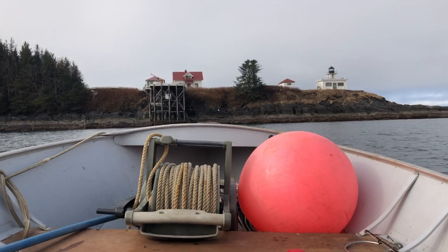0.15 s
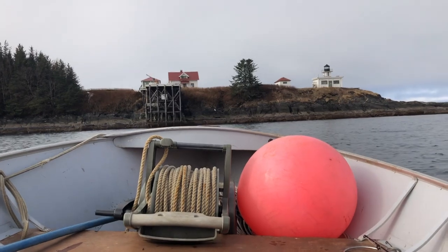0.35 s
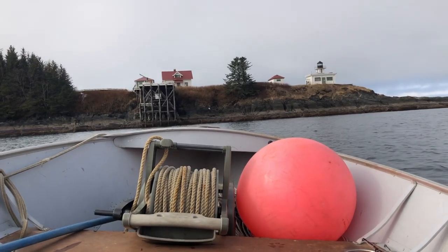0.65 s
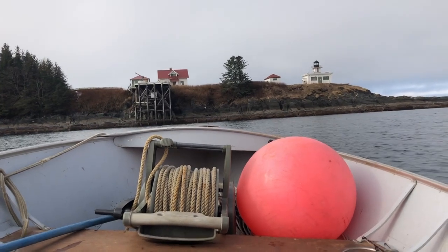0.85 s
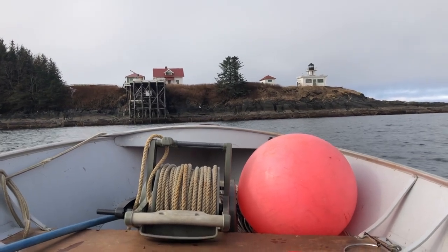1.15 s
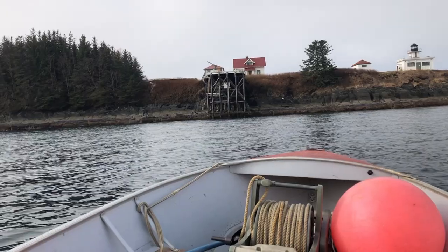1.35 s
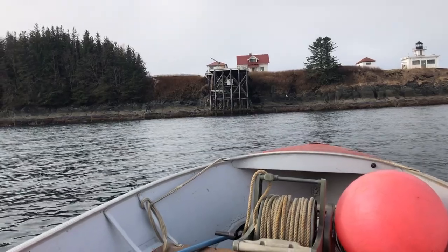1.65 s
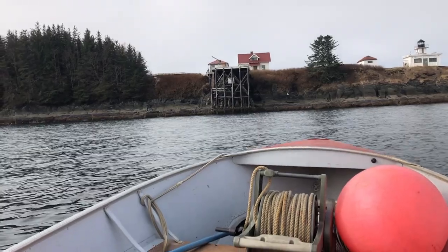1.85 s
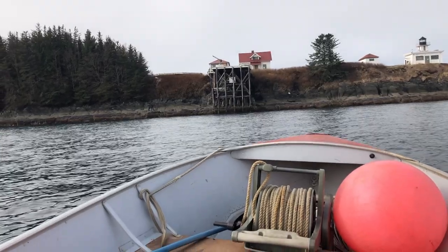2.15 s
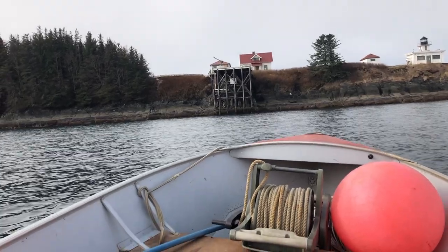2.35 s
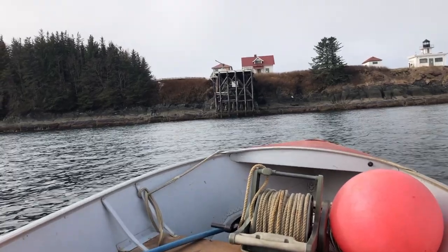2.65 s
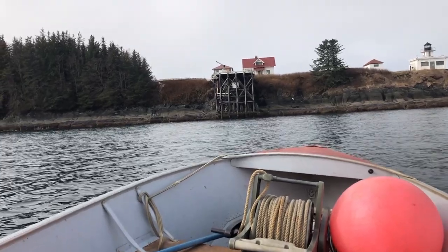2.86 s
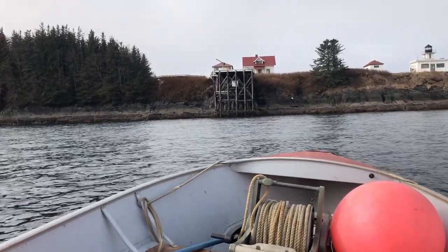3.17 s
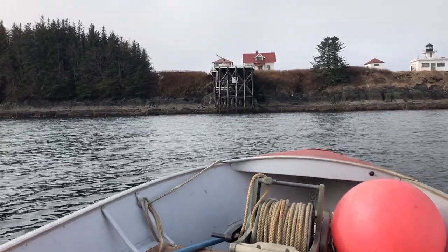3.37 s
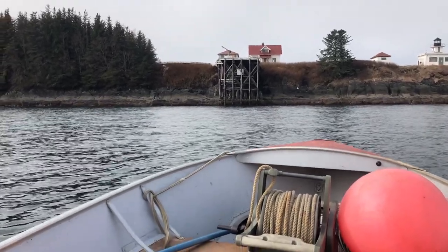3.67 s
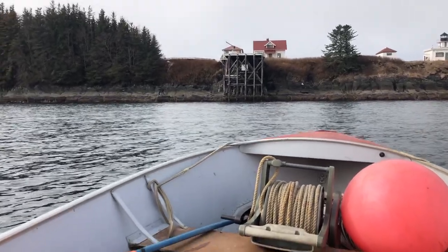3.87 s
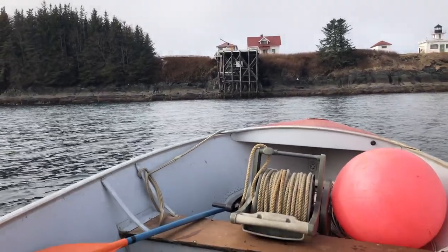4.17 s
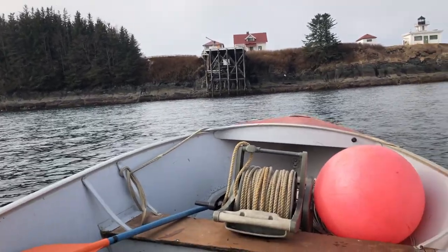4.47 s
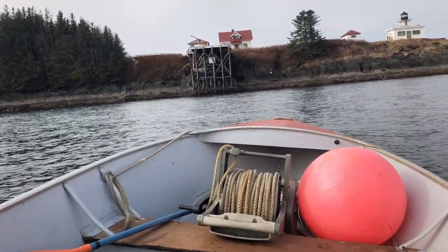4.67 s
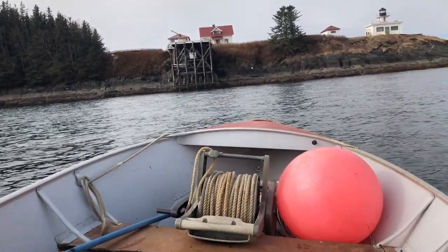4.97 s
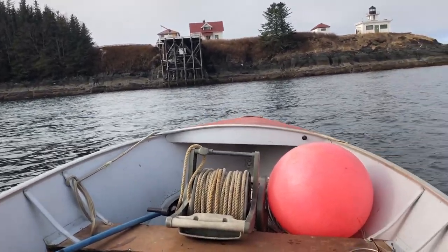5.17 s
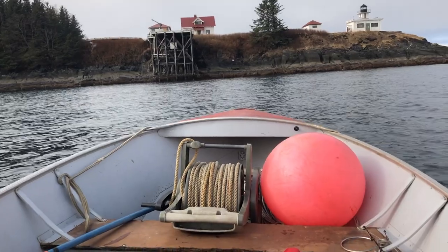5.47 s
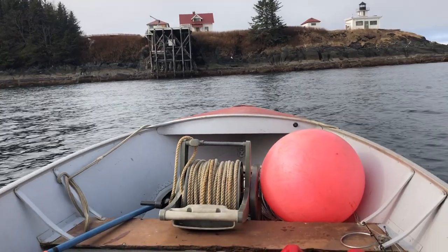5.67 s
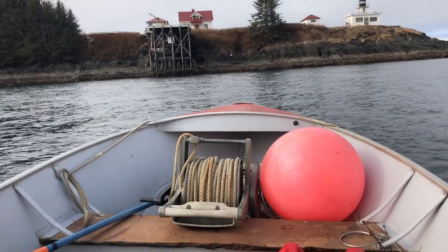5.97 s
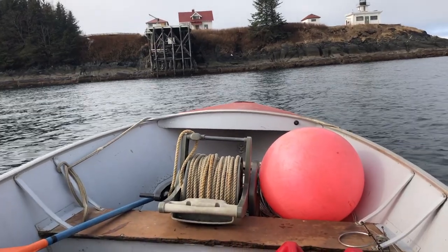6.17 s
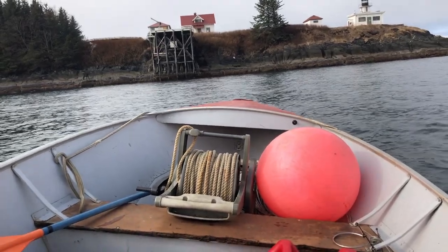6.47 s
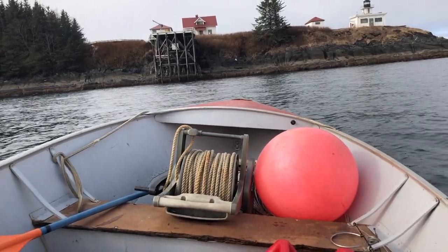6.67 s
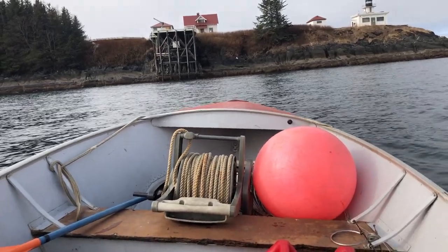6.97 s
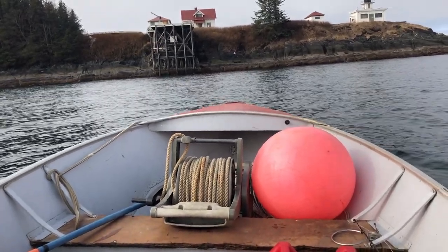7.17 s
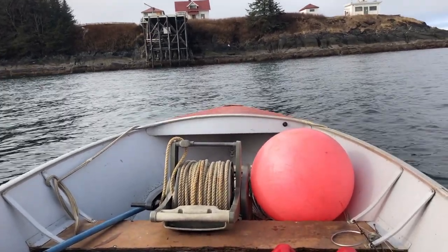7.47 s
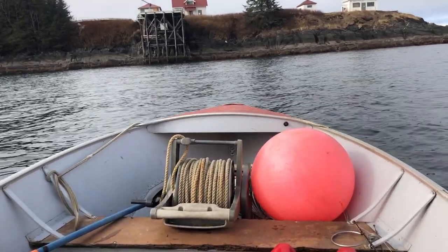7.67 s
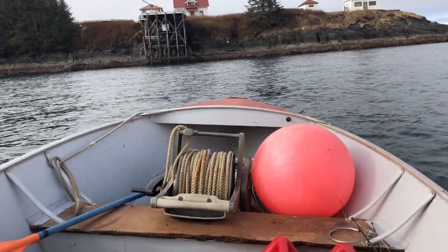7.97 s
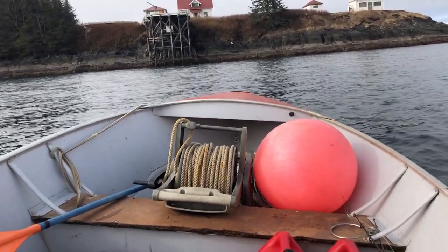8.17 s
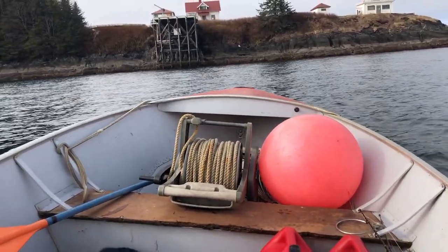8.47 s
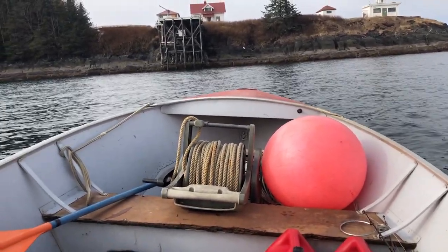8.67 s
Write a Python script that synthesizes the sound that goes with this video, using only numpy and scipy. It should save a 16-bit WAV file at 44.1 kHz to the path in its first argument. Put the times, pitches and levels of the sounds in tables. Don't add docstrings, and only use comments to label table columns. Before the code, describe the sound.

A small three-cylinder outboard shakes a metal skiff, loud and low with dull thumps on the microphone, fading within the first second or so. An abrupt change brings a much quieter airborne idle, puttering and ticking. Around three and a half seconds it picks up under load and whines. Wavelets slap the hull, bubbles chirp, drops tick, and light wind buffets the microphone outdoors at the bow.

```python
import sys
import numpy as np
from scipy import signal
from scipy.fft import rfft, irfft, next_fast_len
from scipy.io import wavfile
from scipy.ndimage import uniform_filter1d, map_coordinates

SR = 44100
rng = np.random.default_rng(int(sys.argv[2]) if len(sys.argv) > 2 else 0)


def nominal_scale(level):
    x = np.asarray(level, float) / 20
    return 10 ** x


def store_pcm(level_fs):
    pcm = np.round(np.clip(level_fs, -1, 1) * 32767).astype(np.int16)
    wavfile.write(sys.argv[1], SR, np.atleast_2d(pcm).T)


N = 388942
T = np.arange(N) / SR
CUT_S = 1.207


def unit(x):
    return x / np.sqrt(np.mean(x ** 2) + 1e-20)


def noise():
    return rng.standard_normal(N)


def curves(rows):
    return np.interp(T, *np.transpose(rows))


def humps(rows):
    return sum(db * np.exp(-((T - s) / half) ** 2) for s, db, half in rows)


def wobble(rate):
    return map_coordinates(rng.standard_normal(int(N * rate / SR) + 4), [T * rate])


def filtered(x, response):
    m = next_fast_len(N + SR)
    return irfft(rfft(x, m) * response(np.fft.rfftfreq(m, 1 / SR)), m)[:N]


def coloured(x, points):
    hz, db = np.transpose(points)
    return unit(filtered(x, lambda f: nominal_scale(np.interp(np.log(f + 0.012), np.log(hz), db, -120, -120))))


def patchy(patchy_db):
    z = signal.stft(noise(), nperseg=512)[2]
    field = uniform_filter1d(rng.standard_normal(z.shape), size=7, axis=0)
    field = uniform_filter1d(field, size=5, axis=1)
    return signal.istft(z * nominal_scale(patchy_db * unit(field)), nperseg=512)[1][:N]


def resonant(x, modes):
    def response(f):
        total = 0
        for k, (centre, width, db) in enumerate(modes):
            damping = 1j * f * width
            total = total + (-1) ** k * nominal_scale(db) * damping / (centre ** 2 - f * f + damping)
        return total
    return unit(filtered(x, response))


def rings(s, db, hz, t60, rise=0, attack=.002, count=4096):
    s, db, hz, t60, rise = (np.broadcast_to(v, np.shape(s))[:, None] for v in (s, db, hz, t60, rise))
    t = np.arange(count) / SR
    turns = np.cumsum(hz * 2 ** (rise * np.minimum(t / t60, 1)), axis=1) / SR
    envelope = nominal_scale(db - 60 * t / t60) * (1 - np.exp(-t / attack)) * np.hanning(2 * count)[count:]
    wave = envelope * np.sin(2 * np.pi * turns)
    at = np.round(s * SR).astype(int) + np.arange(count)
    return np.bincount(at.ravel(), wave.ravel(), N + count)[:N]


def bursts(s, db, hz, half, skew=0, count=2048):
    s, db, hz, half = (np.broadcast_to(v, np.shape(s))[:, None] for v in (s, db, hz, half))
    t = np.arange(-count, count) / SR
    at = np.round(s * SR).astype(int) + np.arange(2 * count)
    envelope = nominal_scale(db) * np.exp(-(t / (half * (1 + skew * np.sign(t)))) ** 2)
    wave = envelope * np.cos(2 * np.pi * hz * t)
    return np.bincount(at.ravel(), wave.ravel(), N + 2 * count)[count:N + count]


def grains(rate, hz, spread, cycles, size_db, attack=0.00091):
    luck = rng.random((int(rate * N / SR), 4))
    pitch = np.clip(hz * np.exp(spread * (luck[:, 1] + luck[:, 2] - 1) * 2), 200, 15000)
    level_db = -size_db * np.log(luck[:, 3] + .02)
    return unit(rings(luck[:, 0] * N / SR, level_db, pitch, cycles / pitch, rise=0.6, attack=attack, count=768))


def crank():
    # time in seconds, firings per second.
    first_rate = [(0.0, 19.71), (0.4, 20.69), (0.8, 20.32), (1.21, 20.19)]
    second_rate = [(1.2, 20.06), (1.8, 20.46), (2.4, 19.78), (3.0, 20.54), (3.3, 20.15), (3.6, 20.35),
                   (3.9, 22.26), (4.3, 23.26), (4.8, 23.36), (5.4, 22.97), (6.0, 23.19), (6.6, 22.92),
                   (7.2, 22.97), (7.8, 22.94), (8.3, 23.31), (8.82, 22.8)]
    first = T < CUT_S
    count = np.cumsum(np.where(first, curves(first_rate), curves(second_rate))) / SR
    count += np.where(first, -.05, .387 - np.interp(second_rate[0][0], T, count))
    load = np.interp(T, [3.56, 3.95], [0, 1])
    return count, np.array([first, ~first * (1 - load), ~first * load])


def hull_shake(fired, state):
    # cycle order, then dB re the firing line on the hull, idling, under load.
    orders = [(1, -20, -9, -10), (2, -12, -11, -22), (3, 0, 0, 0), (5, -27, -24, -35), (6, -20, -20, -15),
              (8, -37, -25, -26), (9, -31, -12, -23), (10, -36, -32, -33), (12, -25, -29, -17),
              (15, -33, -28, -22), (18, -42, -28, -38), (24, -43, -40, -40), (30, -45, -45, -45)]
    # time in seconds, level in dB.
    contact = [(0, -12), (.1, -6.5), (.88, -8.5), (1.19, -6.5), (1.23, -29.5), (2.1, -32), (2.8, -34),
               (3.45, -30), (3.68, -22), (4.1, -27), (4.5, -28), (4.8, -30.5), (5.8, -29), (6.6, -30),
               (7.5, -33), (8.82, -31.5)]
    # centre in seconds, change in dB, half length in seconds.
    slack = [
        (2.95, -13, .22),
        (2.28, -6, 0.11),
    ]
    shake_db = curves(contact)
    aloft_db = (1 - state[0]) * np.minimum(-30 - shake_db, 1)
    lag_firings = np.dot((0, .07, .23), state)
    out = np.zeros(N)
    for order, *db in orders:
        high = order > 6
        level_db = np.dot(db, state) + high * aloft_db
        if order == 9:
            level_db = level_db + humps(slack)
        if order != 3:
            level_db = level_db + 1.2 * wobble(3)
        out += nominal_scale(level_db) * np.cos(2 * np.pi * order * (fired - high * lag_firings) / 3)
    return np.sqrt(2) * nominal_scale(shake_db) * out


def strokes(shaft, state):
    # place in firings, pitch in Hz, half length in seconds, peak in dB on the hull,
    # idling, under load, scatter in dB.
    parts = [(1.745, 165, .0078, -39, -32, -31, .7), (1.745, 255, .005, -54, -47, -44, 2),
             (2.4, 1325, .0085, -52, -43, -47, .8), (1.745, 330, .006, -48, -42, -39.5, 1.2),
             (2.4, 170, .007, -44, -41, -52, 2), (2.02, 372, .015, -48, -44, -47, 1),
             (2.48, 1465, .008, -56, -56, -49, 3), (1.4, 1330, .006, -58, -53, -51, 3),
             (.41, 368, .007, -50, -41.5, -58, 1.5), (2.76, 175, .007, -60, -54, -44, 2),
             (2.66, 350, .008, -60, -56, -45, 2), (.26, 520, .0022, -46, -40, -56, 1.5),
             (1.25, 530, .0022, -46, -39.5, -56, 1.5), (2.26, 540, .0021, -46, -39.5, -56, 1.5)]
    # centre in seconds, change in dB, half length in seconds.
    pick_up = [
        (3.83, 7, 0.34),
        (2.93, 0.5, .07),
        (3.4, -15, .06),
        (3.38, -26, 0.06),
        (2, -2.5, 0.26),
        (1.5, -8, .2),
        (4.7, 1, .3),
        (8.3, -9, .5),
        (2.72, 2.5, 0.11),
    ]
    harden_db = humps(pick_up)
    out = np.zeros(N)
    for place, hz, half_s, *db, scatter_db in parts:
        at = np.flatnonzero(np.diff(np.floor((shaft - place) / 3)) > 0)
        luck = rng.standard_normal((len(at), 3))
        level_db = np.dot(db, state) + (hz == 1325) * harden_db
        peak_db = level_db[at] + scatter_db * luck[:, 0]
        start_s = np.abs(at / SR + .0002 * luck[:, 1])
        skew = .17 * (hz < 340)
        out += bursts(start_s, peak_db, hz * (1 + .004 * luck[:, 2]), half_s, skew=skew)
    return out


def exhaust(shaft, state):
    # frequency in Hz, density in dB per Hz.
    puff_spectrum = [(180, -28.5), (300, -5), (480, 10), (700, -12.5), (1100, -23), (2000, -14.5),
                     (5000, -18), (9000, -45)]
    since = (shaft - .22) % 1
    length_firings = np.dot((.12, .06, .12), state)
    gate = since * np.exp(-since / length_firings) * nominal_scale(1.3 * wobble(20))
    level_db = np.dot((-44, -42, -56), state) - 9.0
    return nominal_scale(level_db) * coloured(gate * (noise() + 2.0), puff_spectrum)


def casing(shaft, state):
    # resonance in Hz, width in Hz, level in dB.
    cowl_modes = [(874, 164, -5), (1176, 88, -5), (1365, 143, -0.5), (1806, 93, -5), (2230, 80, -6.5)]
    # pitch in Hz, wander in Hz, level in dB on the hull, idling, under load.
    gear_lines = [(728, 3, -9, -6, 1.5), (820, 2, -12, -8, 1), (895, 3, -12, -1, -12),
                  (930, 10, -12, -9, -2), (1146, 5, -12, -3, -3), (1332, 9, -12, -8, -1.5)]
    # centre in seconds, rise in dB, half length in seconds.
    surges = [
        (1.3, 5, .2),
        (3.8, 10, 0.34),
        (4.61, 14.5, 0.23),
        (5.86, 16, 0.17),
        (6.39, 15, 0.15),
        (7.25, 15, 0.63),
        (8.55, 13, 0.32),
    ]
    pan_db = np.dot((-40.5, -43.5, -43), state) + 0.78 * wobble(2.38)
    cowl_db = np.dot((-59.5, -58, -55), state) + 0.15 * wobble(1.5)
    whine_db = np.dot((-73, -60.5, -63), state) + humps(surges)
    beat = nominal_scale(1.5 * np.cos(2 * np.pi * (shaft - .35)) + 0.5 * np.cos(2 * np.pi * (shaft - 2.2) / 3))
    out = nominal_scale(pan_db - 8.5) * resonant(beat * noise(), [(372, 20, 1.5), (255, 90, -9), (420, 30, -8)])
    out += nominal_scale(cowl_db + 2.0) * resonant(beat * noise(), cowl_modes)
    for hz, wander_hz, *db in gear_lines:
        level_db = np.dot(db, state) + 1.5 * wobble(5)
        turns = np.cumsum(hz + 1.6 * wander_hz * wobble(9)) / SR
        out += nominal_scale(cowl_db - 5.2 + level_db) * np.sin(2 * np.pi * turns)
    whine = resonant(resonant(beat * noise(), [(1462, 60, 0)]), [(1462, 70, 0)])
    return out + nominal_scale(whine_db - 4.5) * whine


def motor():
    fired, state = crank()
    shaft = fired + np.interp(T, [3.4, 3.95], [0, 1 / 3])
    return hull_shake(fired, state) + strokes(shaft, state) + exhaust(shaft, state) + casing(shaft, state)


def running_water():
    # time in seconds, strength in dB.
    flow = [(0, -49.5), (.275, -46.5), (.31, -57), (.55, -55.5), (.82, -60.5), (1.19, -55), (1.23, -66.5),
            (2.3, -64), (3, -63), (5.25, -61.5), (5.5, -66), (6.2, -61), (6.55, -61.5), (7.0, -57.5),
            (7.4, -56), (7.65, -60.5), (8.0, -62.5), (8.7, -57)]
    # centre in seconds, rise in dB, half length in seconds.
    breaking = [(1.5, 6, .02), (1.82, 5.5, 0.015), (2.52, -2, 0.013), (3.59, 2.5, 0.014), (3.93, 2.5, .03),
                (4.25, 0, 0.02), (4.54, 2, 0.01), (5.2, -2, .03), (5.75, -1, 0.016), (6.9, -2, 0.017),
                (8.57, 4.5, 0.023), (1.95, 3, .05), (2.09, 8, 0.04), (2.39, 3.5, 0.037), (2.64, 0, 0.081),
                (6.39, 5.5, 0.051), (6.7, -1, 0.02), (6.83, -2, 0.012), (7.43, 2, 0.036), (7.64, 4, 0.012),
                (7.82, 5.5, 0.078), (8.16, 2.5, 0.058)]
    # centre in seconds, dB, half length in seconds.
    backwash = [(.25, 1.5, 0.049), (0.328, 6.5, 0.046), (0.56, 2, 0.022), (0.69, 3, 0.22),
                (1.076, 5.5, 0.078), (6.4, 1, 0.28), (4.14, -3.5, 0.36), (0.41, 1, 0.055),
                (0.67, -1.5, .05), (7.1, 2.5, 0.13), (4.8, -1.5, 1.6), (8.81, 4, 0.45)]
    # centre in seconds, change in dB, half length in seconds.
    shelter = [
        (8.1, 2, 0.18),
        (8.3, -5.5, 1),
    ]
    # frequency in Hz, density in dB per Hz.
    wash_spectrum = [(120, -29.5), (250, 0.5), (430, -2), (540, -3.5), (720, -3), (1300, -4), (1700, -10),
                     (2600, -18.5), (4000, -25)]
    splash_spectrum = [(1060, -22), (1800, -22), (1930, -1), (2300, -7.5), (2570, -6), (5500, -8),
                       (6200, -19.5), (8840, -43.5)]
    spray_spectrum = [(3410, -8), (5800, -6), (6650, -6.5), (8000, -4.5), (10200, -8.5), (11200, -12),
                      (15600, -23.5)]
    mean_flow_db = -62
    flow_db = curves(flow)
    splash_db = flow_db + humps(breaking)
    wash_db = -52 + 0.43 * (flow_db - mean_flow_db) + humps(backwash)
    spray_db = -70 + 0.98 * (splash_db - mean_flow_db) + humps(shelter)
    lap = np.where(T < CUT_S, .4, 1) * wobble(7.7)
    spritz_db = 1.4 * wobble(18)
    near = np.where(T < CUT_S, .35, 1)
    fizz = near * grains(500, 3800, 0.5, cycles=8.8, size_db=2.0)
    mist = near * grains(280, 9900, 0.47, cycles=8.1, size_db=2.5)
    gurgle = grains(300, 950, .5, cycles=12, size_db=2.5)
    drizzle = near * grains(45, 7000, .6, cycles=14, size_db=3, attack=.0002)
    wash = coloured(patchy(patchy_db=1.3) + .3 * gurgle, wash_spectrum)
    splash = coloured(patchy(patchy_db=2.3) + .5 * fizz, splash_spectrum)
    spray = coloured(patchy(patchy_db=1.5) + .3 * fizz + .25 * mist, spray_spectrum)
    out = nominal_scale(wash_db + 2.0 + 0.77 * lap) * wash
    out += nominal_scale(splash_db + 0.87 * lap + spritz_db) * splash
    out += nominal_scale(spray_db + 1.3 * lap + spritz_db) * spray
    return out + nominal_scale(-80 + .5 * (splash_db - mean_flow_db)) * drizzle


def wave_slaps():
    # start in seconds, peak in dB, pitch in Hz, t60 in seconds.
    hits = [(1.048, -18, 248, 0.097), (1.349, -22, 267, 0.068), (2.328, -27, 243, 0.13),
            (3.21, -24.5, 249, 0.16), (3.771, -26, 263, 0.11), (4.294, -25, 217, 0.068),
            (6.342, -26, 245, 0.09), (6.379, -38, 255, 0.18), (6.697, -33, 387, 0.07),
            (6.698, -35, 500, 0.066), (5.02, -34, 397, 0.076), (7.325, -37, 295, 0.31),
            (8.432, -28.5, 278, 0.16), (8.469, -25.5, 296, 0.16)]
    s, db, hz, t60_s = np.transpose(hits)
    return rings(s, db + 0.5, hz, t60_s, rise=0.32, attack=0.0039, count=8192)


def cracks():
    # start in seconds, peak in dB, t60 in seconds.
    crests = [
        (1.047, -36, .012),
        (1.345, -41, .02),
        (2.316, -29, .03),
        (2.786, -34, .015),
        (5.268, -38, .012),
        (6.405, -38, .02),
        (6.694, -28, .03),
        (8.395, -36, .015),
    ]
    # frequency in Hz, density in dB per Hz.
    crack_spectrum = [(300, -5), (600, 11), (1000, 10.5), (1800, 3.5), (4000, -11), (6500, -17),
                      (12000, -55)]
    envelope = np.zeros(N)
    for s, db, t60_s in crests:
        after_s = np.maximum(T - s, 0)
        envelope += nominal_scale(db - 60 * after_s / t60_s) * (1 - np.exp(-after_s / 0.001))
    return envelope * coloured(noise(), crack_spectrum)


def bubbles():
    # start in seconds, peak in dB, initial pitch in Hz, rise in octaves, life in seconds.
    chirps = [(1.074, -54.5, 3660, -.05, 0.098), (.468, -42, 1170, -0.0095, 0.022),
              (2.385, -51, 1960, 0.66, .015), (2.635, -45, 854, 0.28, 0.048),
              (3.153, -45.5, 2300, -.5, 0.018), (3.158, -49, 1950, 0.48, .014),
              (5.265, -40, 1195, -0.44, 0.019), (5.79, -40.5, 428, -0.13, 0.03),
              (2.92, -43, 485, 0.011, 0.046), (4.74, -44, 880, 0.25, 0.023),
              (6.405, -46.5, 687, 0.032, 0.047), (6.985, -40, 923, 0.73, 0.022),
              (7.53, -55.5, 6200, -.05, 0.032), (7.552, -38, 482, 1.33, 0.061),
              (7.725, -43, 733, -0.0067, 0.034), (8.14, -41, 690, 0.31, 0.033),
              (8.39, -37, 680, 0.44, 0.018), (8.685, -38, 528, -0.19, 0.039), (8.70, -38, 858, 0.49, 0.03),
              (8.66, -44, 2260, 0.43, 0.013)]
    out = np.zeros(N + SR)
    for s, db, hz, rise, life_s in chirps:
        u = np.linspace(0, 1, int(life_s * SR))
        turns = np.cumsum(hz * 2 ** (rise * u)) / SR
        out[round(s * SR):][:len(u)] += nominal_scale(db) * np.sin(np.pi * u ** 0.45) * np.sin(2 * np.pi * turns)
    return out[:N]


def drops():
    # start in seconds, peak in dB, pitch in
    # Hz.
    spits = [(1.636, -48, 3100), (2.3184, -46, 2870), (2.4027, -41, 3850), (2.5145, -43, 5200),
             (2.6851, -46, 3060), (2.7843, -48, 3350), (3.3815, -48, 2730), (3.4598, -44, 3070),
             (3.5431, -46, 2950), (3.5666, -48, 3340), (3.6868, -44, 3120), (4.3508, -49, 2990),
             (4.4331, -50, 4150), (4.479, -48, 2900), (4.5389, -45, 2790), (4.6232, -49, 2950),
             (4.7534, -42, 2600), (4.8057, -50, 3050), (5.0083, -46, 3070), (5.127, -42, 4380),
             (5.1924, -43, 3800), (5.2253, -49, 2900), (5.2697, -37, 3090), (5.4009, -46, 3320),
             (5.5311, -48, 3330), (5.6618, -48, 2900), (5.7311, -46, 3170), (5.792, -48, 2920),
             (5.8793, -40, 4760), (6.3168, -46, 2950), (6.3887, -45, 2660), (6.695, -49, 2900),
             (6.7404, -40, 4070), (6.8007, -45, 3150), (6.8187, -37, 3340), (6.9384, -43, 2880),
             (7.0107, -43, 3530), (7.0447, -43, 4470), (7.0791, -44, 2960), (7.1958, -44, 2680),
             (7.2442, -45, 2870), (7.4607, -40, 3120), (7.4981, -39, 3680), (7.576, -51, 2650),
             (7.6159, -45, 2990), (7.6393, -48, 2810), (7.7331, -50, 3390), (7.7705, -46, 4420),
             (7.8339, -43, 2870), (8.1457, -44, 4470), (8.199, -43, 2780), (8.4734, -46, 2810),
             (8.4934, -46, 2850), (8.5687, -43, 2800), (8.662, -39, 2830), (8.7872, -50, 3100),
             (2.3191, -43, 4370), (2.4294, -56, 4530), (4.3101, -52, 4890), (4.342, -50, 5610),
              (4.3505, -49, 4040), (4.5444, -51, 4200), (4.8055, -46, 4490), (4.8574, -51, 4650),
              (5.2001, -52, 4620), (5.2255, -46, 4240), (5.2589, -48, 5460), (7.6405, -46, 5150),
              (7.7318, -48, 5520), (7.7707, -47, 4420), (8.1459, -50, 4460), (8.1574, -44, 4570),
              (8.1993, -45, 4530), (8.4931, -48, 5280), (8.5704, -42, 4780), (8.6128, -51, 4240),
              (8.7494, -48, 4060)]
    ticks = [(1.047, -31.5, 2010), (1.3845, -61, 7000), (1.6668, -56, 11000), (1.82, -56, 7500),
             (2.0065, -53, 12000), (2.048, -47, 5200), (2.1038, -44, 6500), (2.3557, -49, 7220),
             (2.685, -58, 11000), (2.7025, -52, 7000), (2.95, -55, 7000), (3.59, -54, 7000),
             (4.5393, -48, 5710), (4.7882, -54, 7000), (4.8576, -52, 6340), (5.0786, -58, 12500),
             (5.1998, -58, 11700), (5.2153, -52, 8500), (5.6982, -57, 7000), (6.1232, -60, 12000),
             (6.3826, -48, 7000), (6.431, -55, 7000), (6.6684, -46, 7600), (6.669, -50, 10800),
             (6.7278, -56, 12000), (6.8939, -53, 7270), (7.2217, -51, 11500), (8.4354, -54, 7000)]
    s, db, hz = np.transpose(spits)
    out = rings(s, db + 0.5, hz, 0.011, rise=.3, attack=0.0004, count=1024)
    return out + bursts(*np.transpose(ticks), np.full(len(ticks), .0005), count=256)


def cooling_jet():
    # centre in seconds, rise in dB, half length in seconds.
    jet_rises = [
        (2.85, 10.2, 0.43),
        (4.3, 5.9, 1.3),
        (7.201, 8.4, 0.41),
    ]
    hiss = resonant(resonant(noise(), [(9700, 1700, 0)]), [(9700, 1800, 0)])
    return nominal_scale(-84 + humps(jet_rises)) * (T > CUT_S) * hiss


def water():
    return running_water() + wave_slaps() + cracks() + bubbles() + drops() + cooling_jet()


def wind():
    # centre in seconds, rise in dB, half length in seconds.
    gusts = [(.5, 7, 0.15), (1.23, 6.5, 0.056), (1.72, 12, 0.13), (2.1, 10, 0.2), (2.6, 8, 0.11),
             (3.75, 8, 0.14), (4.3, 9.5, 0.45), (4.75, 12.5, 0.23), (5.5, 11, 0.4), (6.55, 14.5, 0.22),
             (7.04, 8, 0.066), (7.6, 15.5, 0.13), (8.2, 14, 0.3), (8.68, 16.5, 0.16)]
    eddies = [
        (.5, -4.5, 0.4),
        (1.5, 3, 0.25),
        (3.8, 5, 0.3),
        (4.35, 3.5, 0.19),
        (7.2, 4, 0.35),
        (8.7, 4, 0.17),
        (2.95, -0.5, 0.14),
    ]
    # centre in seconds, peak in dB, pitch in Hz, half length in seconds.
    thumps = [(0.699, -14.5, 79, 0.011), (0.721, -19, 59.5, 0.014), (0.749, -11, 79, 0.0077),
              (0.773, -17, 60, 0.014), (0.845, -10, 79, 0.009), (0.868, -14.5, 64.5, 0.0054),
              (3.602, -17.5, 83, 0.0062), (3.626, -37, 95, 0.0068), (3.703, -30, 75, 0.022),
              (3.766, -28.5, 90, 0.011), (3.864, -20, 81, 0.0097), (3.882, -31, 85, 0.012),
              (3.918, -24.5, 79.5, 0.011), (3.984, -29.5, 75, 0.011), (4.296, -26.5, 84, 0.017),
              (7.059, -26.5, 68, 0.012), (7.3, -30, 72.6, 0.009)]
    # frequency in Hz, density in dB per Hz.
    swell_spectrum = [(.6, -16), (2, -6.5), (4, -8), (7, -17), (11, -28), (20, -48)]
    buffet_spectrum = [(12, -32.5), (28, -5), (50, -5), (85, -8), (120, -7.5), (170, -8.5), (260, -15),
                       (420, -30)]
    swell_db = np.where(T < CUT_S, -29, -30) + humps(gusts)
    buffet_db = np.where(T < CUT_S, -37, -46) + humps(eddies)
    swell = coloured(noise(), swell_spectrum)
    swell = unit(swell / (0.53 + uniform_filter1d(np.abs(swell), size=SR // 3)))
    buffet = unit(nominal_scale(1.4 * wobble(14)) * coloured(noise(), buffet_spectrum))
    return nominal_scale(swell_db) * swell + nominal_scale(buffet_db) * buffet - bursts(*np.transpose(thumps))


def scene():
    return (motor() + water() + wind())[None]


def band_limit(x):
    return signal.sosfilt(signal.butter(12, 15710, fs=SR, output="sos"), x)


def record(dry):
    first = T < CUT_S
    closing = (CUT_S - T) / .02
    opening = np.minimum((T - CUT_S) / .008, (T[-1] - T) / .01)
    splice = np.clip(np.where(first, closing, opening), 0, 1)
    fade = nominal_scale(-21.5 * first * np.clip(1 + (T - CUT_S) / 0.64, 0, 1) ** 3.7)
    held = dry / (1 + np.abs(dry) ** 12) ** (1 / 12)
    return band_limit(held * fade * splice)


dry = scene()
out = record(dry)
store_pcm(out)
```